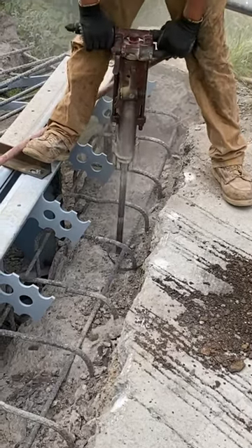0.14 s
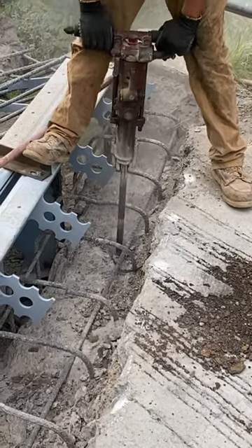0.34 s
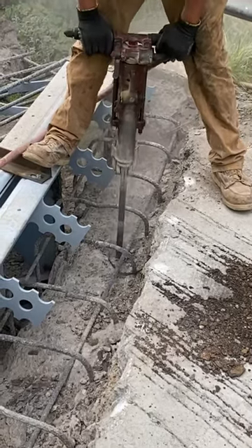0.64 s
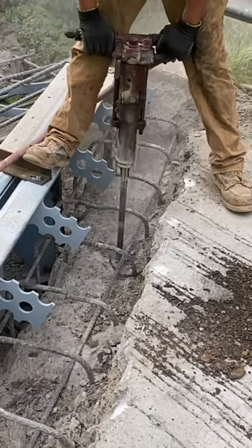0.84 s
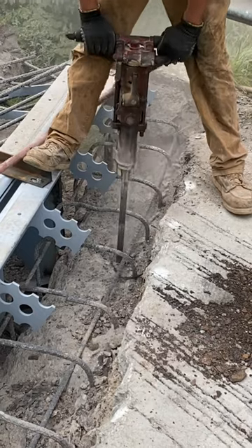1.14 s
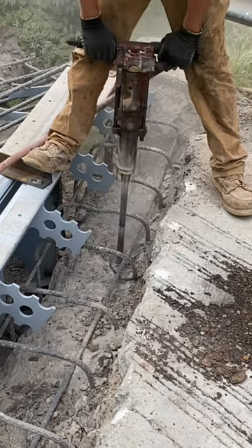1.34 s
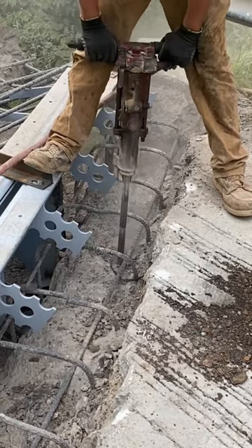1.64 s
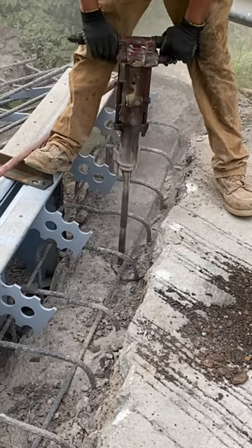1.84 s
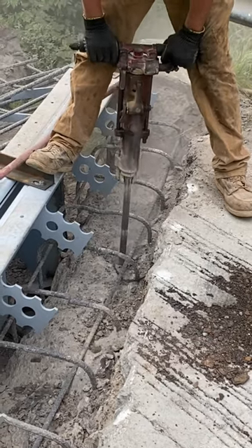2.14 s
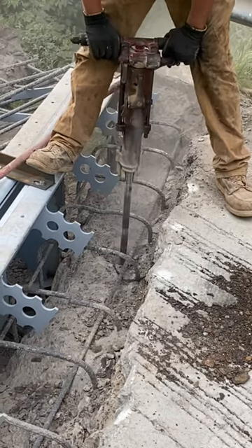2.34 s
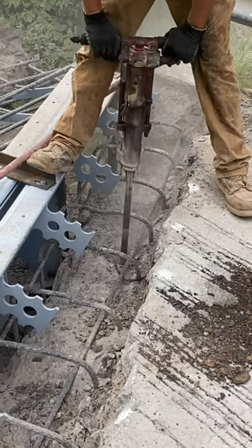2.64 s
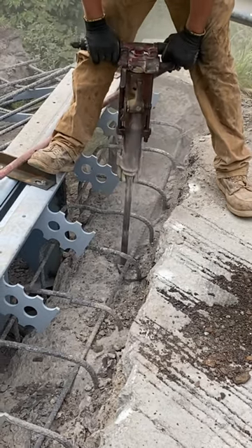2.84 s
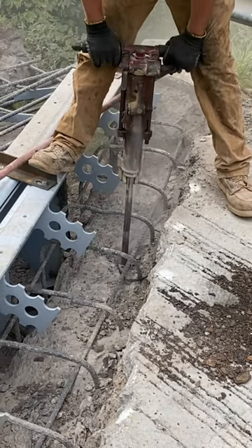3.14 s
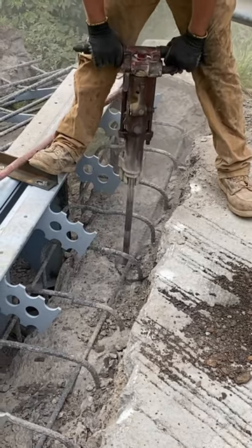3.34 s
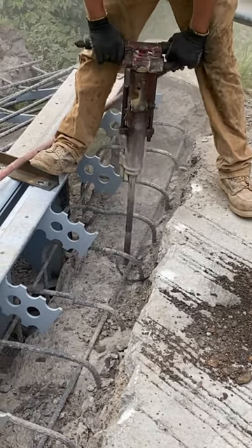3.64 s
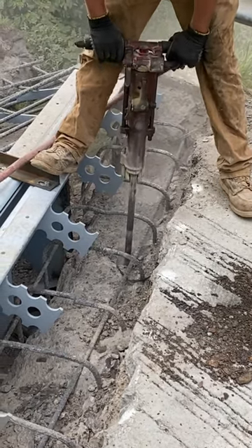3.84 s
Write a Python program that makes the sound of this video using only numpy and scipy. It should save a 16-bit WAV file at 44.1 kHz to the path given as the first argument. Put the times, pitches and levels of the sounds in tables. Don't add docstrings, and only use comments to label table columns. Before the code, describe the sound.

A pneumatic rock drill hammers concrete continuously from 0 to 4 seconds, about 32 blows per second, slightly uneven. Each blow combines a dry exhaust pop, low slab thump, steel tick and housing clatter. The rod's bright ring swells, then chokes briefly, notably near 0.3, 0.9, 1.2, 1.8, 2.4, 2.7, 3.0 and 3.5 seconds. Air hisses, a compressor hums faintly; short outdoor echoes, close phone, thin deep bass.

```python
import sys
import numpy as np
from scipy import signal
from scipy.fft import rfft, irfft
from scipy.io import wavfile
from scipy.ndimage import uniform_filter1d

SR = 44100
rng = np.random.default_rng(int(sys.argv[2]) if len(sys.argv) > 2 else 0)


def voltage_ratio(level):
    return 10 ** (np.asarray(level, float) / 20)


def wrap_up_sound(samples):
    columns = np.atleast_2d(samples).T
    tamed = np.clip(columns, -1, 1)
    steps = np.round(tamed * 32767).astype(np.int16)
    wavfile.write(sys.argv[1], SR, steps)


N = 176400


def evened(x):
    return x / np.sqrt(np.mean(x ** 2) + 1e-20)


def read(points, hz):
    f, value = np.transpose(points)
    return np.interp(np.log(hz + 1), np.log(f + 1), value)


def shaped(x, gain):
    return irfft(rfft(x) * gain(np.fft.rfftfreq(N, 1 / SR)), N)


def resonate(x, hz, width_hz):
    r = np.exp(-np.pi * width_hz / SR)
    return signal.lfilter([1, 0, -1], [1, -2 * r * np.cos(2 * np.pi * hz / SR), r * r], x)


def after(train, delay_ms, shape):
    played = signal.oaconvolve(train, shape)[:N]
    return np.roll(played, round(delay_ms * SR / 1000))


def swell(rise_ms, t60):
    t = np.arange(SR // 8) / SR
    return (1 - np.exp(-t * 1000 / rise_ms)) * voltage_ratio(-60 * t / t60)


def clicks(per_s, spread_db):
    size = voltage_ratio(spread_db * np.minimum(rng.exponential(1, N), 4)) * rng.standard_normal(N)
    return size * (rng.random(N) < per_s / SR)


# time in seconds, lag in ms.
PISTON_LAG = [(0.0, 13.7), (0.06, 11.5), (0.22, 14.6), (0.34, 12.6), (0.37, 8.5), (0.71, 15.5),
              (1.12, 10.7), (1.24, 14.2), (1.46, 10.0), (1.8, 13.7), (1.98, 11.4), (2.39, 17.7),
              (2.7, 16.9), (3.5, 11.1), (3.56, 8.4), (3.66, 11.1), (3.81, 8.0), (3.97, 10.5)]
BEAT_WOBBLE = rng.standard_normal(200)


def blows(spread_db):
    blows_per_s, jitter_ms = 32.28, 0.35
    beat = np.arange(int(N / SR * blows_per_s)) / blows_per_s
    lag_ms = np.interp(beat, *np.transpose(PISTON_LAG)) + jitter_ms * BEAT_WOBBLE[:len(beat)]
    at = beat + lag_ms / 1000
    train = np.zeros(N)
    train[np.round(at * SR).astype(int)] = voltage_ratio(spread_db * rng.standard_normal(len(beat)))
    return train


# delay in ms, pitch in Hz, t60 in seconds, rise in ms, level in dB.
BLOW_RINGS = [
    (-0.46, 1314, 0.0026, 0.34, -11.5),
    (0.28, 326.3, 0.076, 5.8, -23.5),
    (3, 136.7, .06, 9.4, -25.5),
    (8.5, 62.7, 0.056, 8.5, -28),
    (17, 328, 0.051, 1.7, -26.5),
    (17.5, 990, 0.004, 0.28, -27),
]


def thump():
    train = blows(1.0)
    t = np.arange(SR // 8) / SR
    out = 0
    for delay_ms, hz, t60, rise_ms, db in BLOW_RINGS:
        envelope = swell(rise_ms, t60)
        ring = np.sin(2 * np.pi * hz * t) * envelope / envelope.max()
        out = out + after(train, delay_ms, voltage_ratio(db) * ring)
    return out


# frequency in Hz, gain in dB.
EXHAUST_COLOUR = [(200, -45), (600, -14), (2000, 1.5), (3800, -7), (4400, -11), (6500, -1.5), (11000, -6),
                  (16000, -30)]


def exhaust_coloured(x):
    return shaped(x, lambda hz: voltage_ratio(read(EXHAUST_COLOUR, hz)))


def crack():
    level_db, t60 = -35.5, 0.0067
    tick = after(blows(1.6), -0.48, swell(0.16, t60)) * rng.standard_normal(N)
    return voltage_ratio(level_db) * evened(exhaust_coloured(tick))


# pitch in Hz, width in Hz, level in dB, struck after ms.
HOUSING_MODES = [(686, 54, -37, .5), (1348, 170, -37.5, 0), (1932, 147, -32.5, 1.4), (2310, 96, -45, 1),
                 (3290, 220, -33.5, 2), (3740, 104, -38.5, 3)]


def housing():
    strike_db, clatter_at_ms, clatter_t60, clatter_per_s = 12.5, 1.77, 0.093, 2500
    out = 0
    for hz, width_hz, db, strike_ms in HOUSING_MODES:
        shaking = after(blows(1.5), clatter_at_ms, swell(1.4, clatter_t60))
        clatter = clicks(clatter_per_s, 2.0) * shaking
        strike = voltage_ratio(strike_db) * after(blows(3.2), strike_ms, [1.0])
        out = out + voltage_ratio(db) * evened(resonate(strike + clatter, hz, width_hz))
    return out


ROD_PITCH = [1980, 2851, 3917, 5124, 6442, 6678, 7857, 9365, 10926, 12517, 14217]
# width in Hz, level in dB.
ROD_MODES = [(37.037, -40), (36, -29), (32.2, -33.5), (34, -36), (38, -32.5), (20, -38), (35.8, -33.5),
             (38, -51), (50, -42), (57, -50), (60, -52)]
# time in seconds, ring just before in dB, choke length in seconds, level change in dB.
BIT_TURNS = [(0, -5, 0.059, 12), (0.317, 1.5, 0.046, -18), (0.478, 1, 0.038, -1), (0.944, 2, 0.046, -21),
             (1.22, 2, 0.039, -17), (1.46, -1, 0.018, 6.5), (1.84, 2, 0.048, -22), (1.906, -1, 0.04, -3),
             (2.371, 1.5, 0.04, -20), (2.676, 0.5, 0.042, -16), (3.01, 0.5, 0.044, -20),
             (3.23, 0.5, 0.086, -7), (3.481, 2, 0.076, -24), (3.622, -1.5, 0.095, -6),
             (3.847, -3, 0.032, -4), (4.05, 0, .04, -4)]


def ring_level_db():
    swell_db = 6.5
    t = np.arange(N) / SR
    at, top_db, length, depth_db = np.transpose(BIT_TURNS)
    turn = np.minimum(np.searchsorted(at, t), len(at) - 1)
    part = np.interp(t, at, np.arange(len(at))) % 1
    ring_db = uniform_filter1d(top_db[turn] - swell_db * (1 - part), size=900)
    for a, w, d in zip(at, length, depth_db):
        ring_db = ring_db + d * np.exp(-((t - a) / (w * 0.46)) ** 2)
    return ring_db


def rod():
    slap_at_ms, slap_t60, slaps_per_s, slap_spread_db = 2.5, 0.11, 570, 4.5
    stroke = 0.36 + after(blows(1.54), slap_at_ms, swell(0.86, slap_t60))
    ring = 0
    for hz, (width_hz, db) in zip(ROD_PITCH, ROD_MODES):
        slaps = clicks(slaps_per_s, slap_spread_db) * stroke
        ring = ring + voltage_ratio(db) * evened(resonate(slaps, hz, width_hz))
    return voltage_ratio(ring_level_db()) * ring


# frequency in Hz, gain in dB.
LEAK_COLOUR = [(45, -27), (70, -5), (320, 3), (600, 3), (3700, -19.5), (4400, -10), (6500, -12),
               (11500, -8.5), (16000, -34)]


def air():
    puff_db, return_db, leak_db = -28.5, -8, -31.5
    puff_t60, return_ms = 0.076, 15
    blow_gate = after(blows(2.5), -0.59, swell(1.0, puff_t60))
    return_gate = voltage_ratio(return_db) * after(blows(1.6), return_ms, swell(1.2, 0.037))
    grit = rng.standard_normal(N) + 0.32 * clicks(1700, 2.9)
    puff = (blow_gate + return_gate) * exhaust_coloured(grit)
    leak = shaped(rng.standard_normal(N), lambda hz: voltage_ratio(read(LEAK_COLOUR, hz)))
    return voltage_ratio(puff_db) * evened(puff) + voltage_ratio(leak_db) * evened(leak)


HUM_PITCH = [80.8, 114.7, 222.7, 229.5, 344.4, 458.9, 1607]
# level in dB, waver in Hz.
HUM_LINES = [(-37, 0.24), (-43, 0.084), (-48, .3), (-53, 0.77), (-40, 0.72), (-42.5, 0.82), (-41, 1.9)]


def compressor():
    drift = uniform_filter1d(rng.standard_normal(N), size=9000)
    drift = evened(uniform_filter1d(drift, size=9000))
    hum = 0
    for hz, (db, waver_hz) in zip(HUM_PITCH, HUM_LINES):
        cycles = np.cumsum(hz + waver_hz * drift) / SR + rng.random()
        hum = hum + np.sqrt(2) * voltage_ratio(db) * np.sin(2 * np.pi * cycles)
    return hum


def site(x):
    t60, first_echo_s = 0.26, 0.003
    t = np.arange(SR // 4) / SR
    taps = rng.standard_normal((2, len(t))) * (rng.random((2, len(t))) < 0.05)
    taps = taps * (t > first_echo_s) * voltage_ratio(-60 * t / t60)
    return signal.fftconvolve(x[None], taps / np.linalg.norm(taps[0]), axes=1)[:, :N]


# frequency in Hz, left minus right in dB.
PORT_BALANCE = [(100, 0.21), (400, 4.2), (1000, 9.4), (1850, 4.9), (2600, 9.4), (4300, 2.7), (5400, 10.7),
                (7000, 0.19)]
# frequency in Hz, left lead in radians.
PORT_LEAD = [(100, 0.32), (860, 0.92), (1700, 1.62), (2300, 1.47), (3600, 0), (7000, 0)]


def port(hz, side):
    split_hz, delay_ms = 7000, 0.25
    lead = read(PORT_LEAD, hz) - 2 * np.pi * np.maximum(hz - split_hz, 0) * delay_ms / 1000
    return voltage_ratio(side * read(PORT_BALANCE, hz) / 2) * np.exp(0.5j * side * lead)


def scene():
    echo_db = -8
    drill = thump() + crack() + housing() + rod() + air()
    echoes = site(shaped(drill, lambda hz: hz / (hz + 500)))
    heard = drill + compressor() + voltage_ratio(echo_db) * echoes
    left = shaped(heard[0], lambda hz: port(hz, 0.82))
    right = shaped(heard[1], lambda hz: port(hz, -1.05))
    return np.array([left, right])


def roll_off(x):
    return signal.sosfilt(signal.butter(12, 15830, fs=SR, output="sos"), x)


def record(dry):
    low_cut = signal.butter(4, 50, "high", fs=SR, output="sos")
    mix = signal.sosfilt(low_cut, dry)
    return roll_off(mix)


dry = scene()
out = record(dry)
wrap_up_sound(out)
```